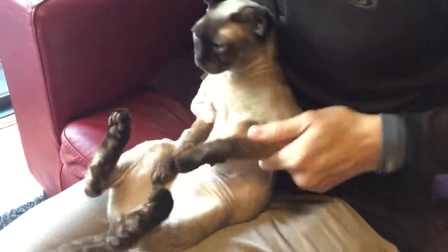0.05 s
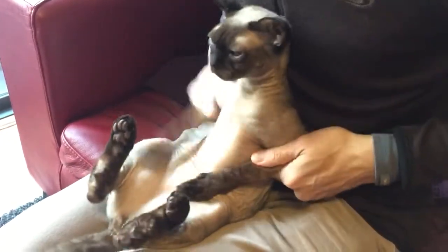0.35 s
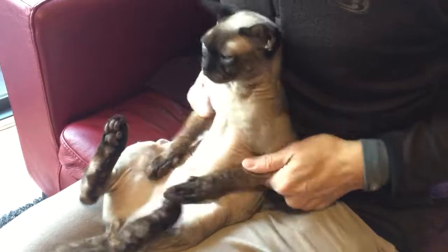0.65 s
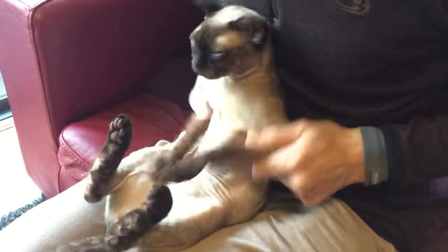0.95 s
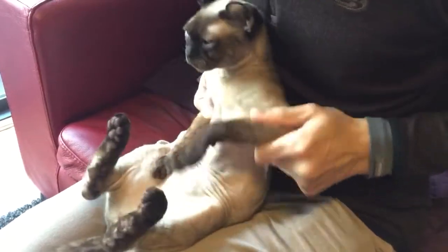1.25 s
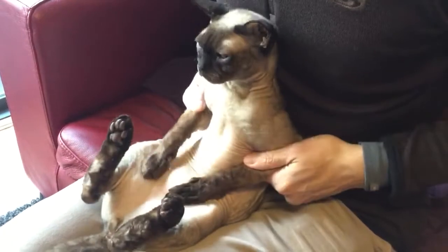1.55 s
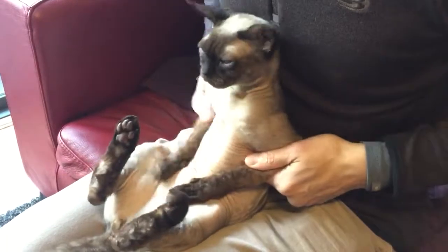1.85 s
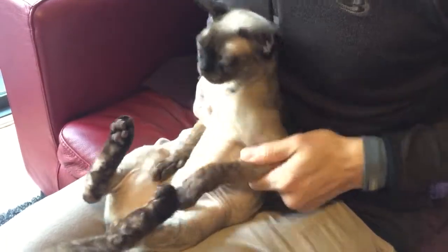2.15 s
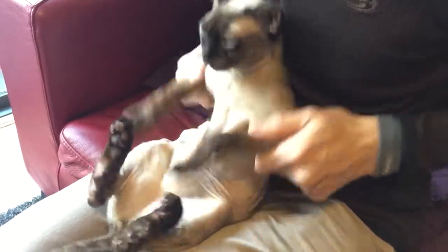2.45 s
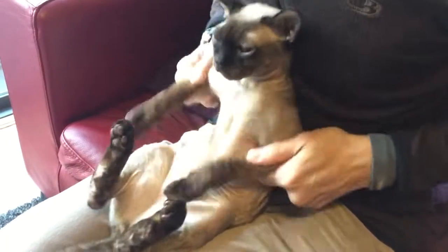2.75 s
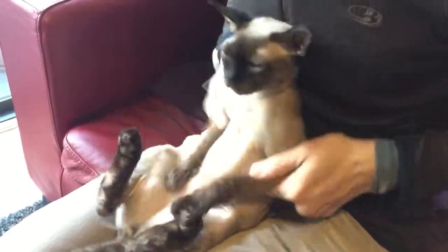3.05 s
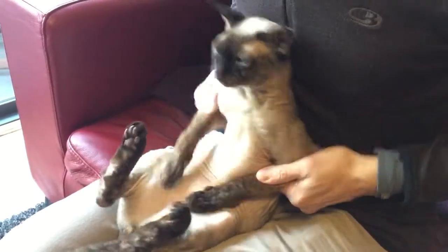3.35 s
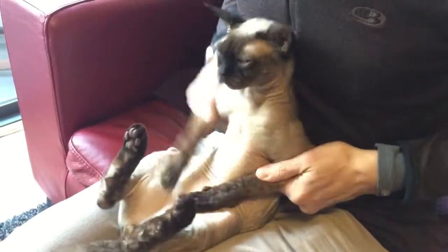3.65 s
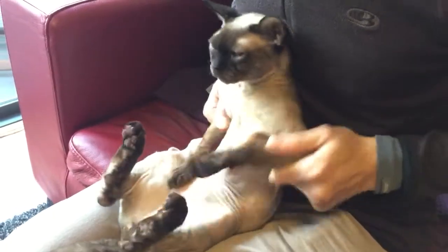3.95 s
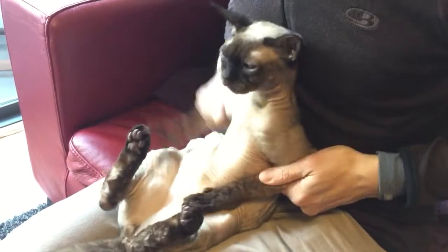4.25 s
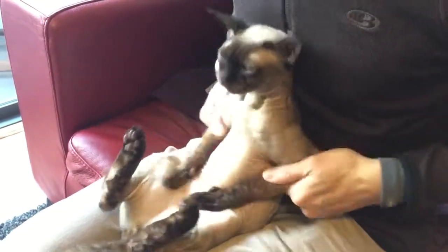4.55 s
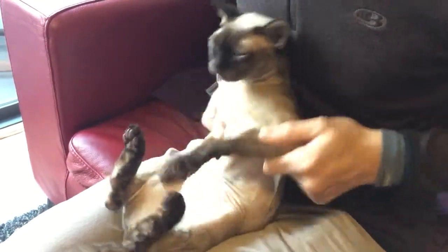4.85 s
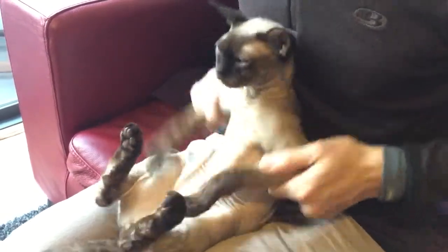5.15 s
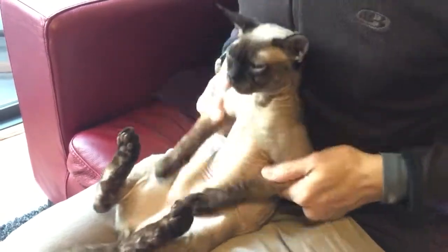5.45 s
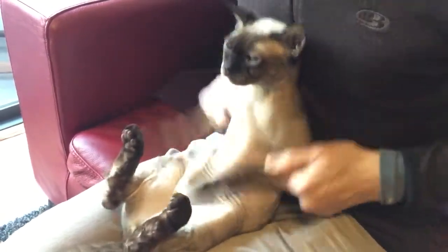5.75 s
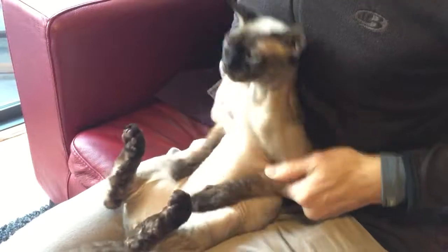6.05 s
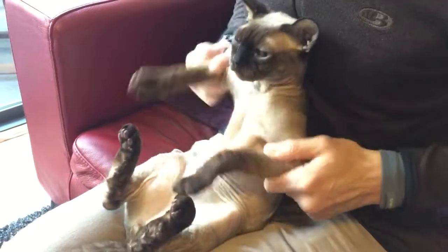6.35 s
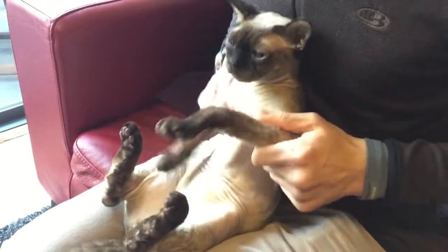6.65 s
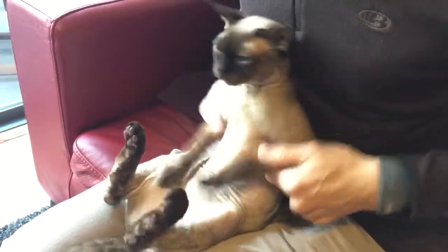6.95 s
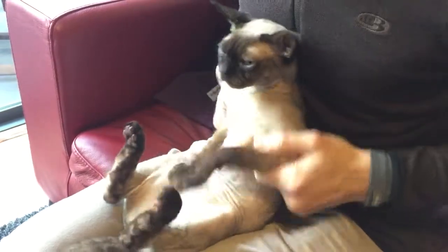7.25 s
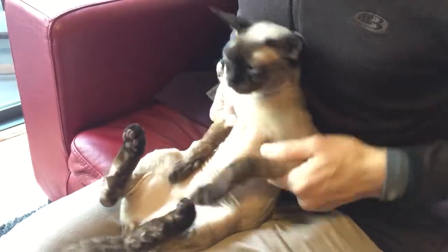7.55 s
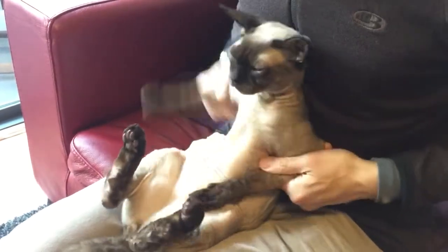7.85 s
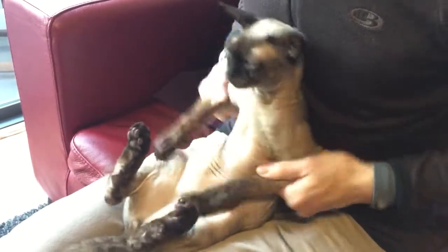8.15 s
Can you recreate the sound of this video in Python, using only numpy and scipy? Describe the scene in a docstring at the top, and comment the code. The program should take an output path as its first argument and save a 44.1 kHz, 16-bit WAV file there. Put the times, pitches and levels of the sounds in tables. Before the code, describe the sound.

Light, quick pats of paws on a cat's bare belly run from start to finish in a loose, irregular beat. Soft, drum-like thumps mix with brighter skin slaps and little pops of air, the strongest coming around the middle. Tiny fur brushes and claw clicks slip in between. The microphone seems near, in a quiet room with slight reverberation and a faint steady hum.

```python
"""Cat paws drumming on a belly

A cat sits on a lap in a quiet living room while two hands drum its front paws on its bare belly.
Each impact slaps the skin, expels a pop of trapped air and excites the belly's damped modes; often
the toes touch down just before the pad. Heavy pats ring longer, crisp ones tick. The room adds
reflections and a short reverberant tail, over a low hum and a faint rustle."""
import sys
import numpy as np
from scipy import signal
from scipy.fft import rfft, irfft
from scipy.io import wavfile

SR = 44100
rng = np.random.default_rng(int(sys.argv[2]) if len(sys.argv) > 2 else 0)


def digitize_waveform(pressure):
    """Quantize a signal to 16-bit integers and store it at the path in sys.argv[1].

    Rows of a 2-D input are taken as channels; values are limited to [-1, 1].
    """
    field = np.atleast_2d(pressure).T
    bounded = np.clip(field, -1, 1)
    quanta = np.round(bounded * 32767).astype(np.int16)
    wavfile.write(sys.argv[1], SR, quanta)


N = 365588
LEAD_S, TOUCH_S = .03, .12   # time ahead of contact, whole length of one touch


def from_db(db):
    """Amplitude ratio of a level in decibels."""
    return 10 ** (np.asarray(db) / 20)


def unit_rms(x):
    """Normalisation to unit mean power."""
    return x / np.sqrt(np.mean(x ** 2) + 1e-30)


def at_level(x, db):
    """Equivalent level: each row gets the energy of 10 ms at this rms level."""
    energy = np.sum(x ** 2, axis=-1, keepdims=True)
    return x * from_db(db) * np.sqrt(.01 * SR / (energy + 1e-30))


def band(x, low_hz, high_hz, order=2):
    """Band limiting by a causal Butterworth filter."""
    edges_hz = [low_hz, min(high_hz, .45 * SR)]
    return signal.sosfilt(signal.butter(order, edges_hz, "band", fs=SR, output="sos"), x)


def bell(x, hz, width_hz, gain_db):
    """A second-order peak or dip in the spectrum."""
    gain = from_db(gain_db / 2)
    width = np.tan(np.pi * width_hz / SR)
    tuning = -2 * np.cos(2 * np.pi * hz / SR)
    numerator = [1 + width * gain, tuning, 1 - width * gain]
    denominator = [1 + width / gain, tuning, 1 - width / gain]
    return signal.lfilter(numerator, denominator, x)


def at_hz(table, hz, column=1):
    """Interpolation of a table column over log frequency."""
    table = np.array(table)
    return np.interp(np.log(hz + 1e-9), np.log(table[:, 0]), table[:, column])


def drift(per_s):
    """Slow random modulation: straight lines between Gaussian values."""
    knots = rng.standard_normal(400)
    return np.interp(np.arange(N) / SR * per_s, np.arange(len(knots)), knots)


# Noise spectrum of still room air: frequency_hz, relative_density_db
AIR_SPECTRUM = [(20, -58), (45, 0.5), (120, 0), (170, -4), (300, -8.5), (500, -15), (800, -21),
                (2200, -22.5), (5000, -27), (10500, -31), (15000, -33.5)]
# Tones of an appliance hum: pitch_hz, peak_level_db
HUM_TONES = [(100, -65.5), (141, -74.5)]


def room_air(air_db, waver_db):
    """Ambient noise: a dull continuous spectrum plus hum tones modulated in level and phase."""
    hz = np.arange(N // 2 + 1) * SR / N
    t = np.arange(N) / SR
    spectrum = rfft(rng.standard_normal(N)) * from_db(at_hz(AIR_SPECTRUM, hz))
    out = from_db(air_db) * unit_rms(irfft(spectrum, N))
    for pitch_hz, level_db in HUM_TONES:
        amplitude = from_db(level_db + waver_db * drift(5.3))
        out += amplitude * np.sin(2 * np.pi * pitch_hz * t + 0.19 * drift(2.1))
    return out


def rustle(rub_db, uneven_db):
    """Friction noise: fur and cloth slide in short, uneven rubs made of fine grains."""
    fibres = rng.standard_normal(N) * from_db(9.0 * rng.standard_normal(N))
    rubs = from_db(rub_db + uneven_db * np.tanh(drift(26)))
    return unit_rms(band(fibres, 700, 4500)) * rubs


def echoes(reflections, t, spread):
    """Discrete reflections: delayed impulses whose path lengths vary as the paws move."""
    out = np.zeros(len(t))
    for delay_s, gain_db in reflections:
        out[round(delay_s * SR * (1 + spread * rng.uniform(-1, 1)))] += from_db(gain_db)
    return out


# Strong reflections from lap, sofa and walls: delay_s, gain_db
NEAR_REFLECTIONS = [(.0066, -16), (.0127, -23.5), (.0201, -22.5)]
# Far reflections that keep only the thump: delay_s, gain_db
FAR_REFLECTIONS = [(.0235, -58), (.0555, -23.5), (.0675, -29), (.082, -28)]
# Diffuse field of the room: frequency_hz, gain_db, t60_s
REVERBERATION = [(95.5, -11, 0.28), (292, -14, 0.3), (617, -16.5, 0.38), (1200, -9.5, 0.41),
                 (2400, -10, 0.35), (4700, -15, 0.42), (8000, -16.5, 0.36), (14000, -12, 0.3)]


def living_room(build_s):
    """Impulse response: discrete reflections and a diffuse tail decaying exponentially in each band."""
    t = np.arange(SR // 3) / SR
    response = band(echoes(NEAR_REFLECTIONS, t, spread=0.11), 380, 7100, order=1)
    response += band(echoes(FAR_REFLECTIONS, t, spread=0.028), 152, 385)
    edges_hz = np.geomspace(60, 16000, 11)
    for low, high in zip(edges_hz, edges_hz[1:]):
        centre_hz = np.sqrt(low * high)
        t60_s = at_hz(REVERBERATION, centre_hz, column=2)
        envelope = from_db(-60 * t / t60_s) * (1 - np.exp(-t / build_s))
        tail = unit_rms(band(rng.standard_normal(len(t)), low, high, order=3) * envelope)
        band_share = 2 * (high - low) / SR   # of a unit impulse's energy
        response += tail * from_db(at_hz(REVERBERATION, centre_hz)) * np.sqrt(band_share / len(t))
    return response


def play_in_room(events, sound_of, spots):
    """Superposition of direct and reflected sound; events cycle through spots with their own response."""
    out = np.zeros(N + SR)
    responses = [living_room(build_s=0.0042) for _ in range(spots)]
    for k, (start_s, *settings) in enumerate(events):
        direct, room_feed = sound_of(*settings)
        reflected = signal.fftconvolve(room_feed, responses[k % spots])
        start = round((start_s - LEAD_S) * SR)
        out[start:start + len(direct)] += direct
        out[start:start + len(reflected)] += reflected
    return out[:N]


def contact(t, grain_db, approach_s, settle_s, fur_db, fur_s):
    """Contact noise: an impulse amid grains from closing skin and brushing hair.
    Row 0 is the direct sound; row 1 feeds the room, where the grains of all directions average out."""
    before, after = np.minimum(t, 0), np.maximum(t, 0)
    click = 1. * (np.arange(len(t)) == np.argmin(np.abs(t)))
    closing = np.exp(before / approach_s - after / settle_s)
    fur = from_db(fur_db) * np.exp(before / (0.5 * fur_s) - after / fur_s)
    grains = unit_rms(rng.standard_normal(len(t)) * (closing + fur)) / np.sqrt(len(t))   # unit energy
    return np.array([click + from_db(grain_db) * grains, click])


def graze(level_db, centre_hz, width_octaves, swell_s):
    """Transient friction: hair or a claw grazes the skin in a burst of band-limited noise."""
    t = np.arange(int(TOUCH_S * SR)) / SR - LEAD_S
    friction = contact(t, grain_db=67, approach_s=swell_s, settle_s=swell_s, fur_db=-37, fur_s=0.016)
    edge_ratio = 2 ** (width_octaves / 2)
    return at_level(band(friction, centre_hz / edge_ratio, centre_hz * edge_ratio), level_db)


# Brushes of fur and clicks of claws: start_s, level_db, centre_hz, width_octaves, swell_s
GRAZES = [(.183, -59, 4030, 0.87, 0.0038), (.672, -54.5, 2400, 2.4, 0.003),
          (1.662, -56.5, 7100, 1.05, 0.002), (2.638, -57, 2190, 1.5, 0.0052),
          (2.94, -57.5, 2590, 0.2, 0.00099), (4.087, -56, 3200, 2.6, 0.0019), (5.16, -63.5, 3980, .8, 0.02),
          (5.3725, -53, 3300, 2.3, 0.00081), (6.22, -67, 4250, 0.43, 0.023),
          (6.6264, -38.5, 3630, 0.85, 0.00045), (6.966, -63, 6000, 1.1, 0.001),
          (7.056, -52.5, 7600, 0.23, .0004), (7.517, -55, 2550, 0.89, 0.00076),
          (7.5365, -45, 7730, 0.21, 0.00023)]


def fur_and_claws():
    """Grazing contacts excite the room without a thump from the belly."""
    return play_in_room(GRAZES, graze, spots=2)


def belly_mode(t, hz, t60_s, press_s, stretch):
    """Damped oscillation: it builds as the paw presses in, higher in pitch while the skin is stretched."""
    after = np.maximum(t, 0)
    cycles = hz * t + stretch * (1 - np.exp(-hz * after / 2))
    pressed = 1 + np.tanh(t / press_s - 1)
    return -np.sin(2 * np.pi * cycles) * from_db(-60 * after / t60_s) * pressed


def belly_thump(t, thump_db, skin_hz, push_db):
    """Membrane vibration: two skin modes, as on a drumhead, over a deep push of the flesh."""
    ring_s = .025 * 2 ** ((thump_db + 40) / 30)   # a heavier thump rings longer
    push_hz = 156.5 + 2.6 * (push_db + 45)   # flesh stiffens under a harder push
    skin = belly_mode(t, skin_hz, t60_s=ring_s, press_s=0.00068, stretch=0.059)
    overtone = belly_mode(t, 1.554 * skin_hz, t60_s=0.081, press_s=0.0033, stretch=0.028)
    push = belly_mode(t, push_hz, t60_s=0.016, press_s=0.002, stretch=0.0083)
    return at_level(skin, thump_db) + at_level(overtone, thump_db - 25) + at_level(push, push_db)


def air_pop(t, pop_db, slap_db, lightness_db):
    """Compression of trapped air: a harder slap squeezes it out at a higher pitch."""
    pop_hz = 701 + (slap_db + 46)   # 1 Hz per dB
    puff = contact(t, lightness_db + 3.5, approach_s=0.001, settle_s=0.0046, fur_db=-2, fur_s=0.0085)
    return at_level(band(puff, 0.55 * pop_hz, 1.35 * pop_hz), pop_db)


def skin_slap(t, slap_db, slap_hz, lightness_db):
    """Impact noise in three bands: the smack of the pad, the tick of hairs, the fizz of their tips."""
    warped_t = t / from_db(1.9 * lightness_db)   # a lighter blow closes more slowly
    pad = contact(warped_t, lightness_db + 4.9,
                  approach_s=0.00093, settle_s=0.00024, fur_db=-19.5, fur_s=0.0078)
    hairs = contact(warped_t, lightness_db - 1,
                    approach_s=0.00051, settle_s=0.00066, fur_db=-16, fur_s=0.0094)
    tips = contact(t, grain_db=2, approach_s=0.0025, settle_s=0.0016, fur_db=19, fur_s=0.011)
    smack = band(pad, 0.7 * slap_hz, 1.118 * slap_hz, order=1)
    smack = at_level(band(smack, 925, 3780, order=3), slap_db)
    tick_db = slap_db - 13 + 10.5 * np.log2(slap_hz / 2000)   # a brighter slap ticks more
    tick = at_level(band(hairs, 4380, 7380, order=3), tick_db)
    fizz = at_level(band(tips, 7300, 18000), 0.54 * tick_db - 40.5)   # grows less than the blow
    return smack + tick + fizz


def pat(thump_db, skin_hz, push_db, pop_db, slap_db, slap_hz):
    """Impulsive excitation: one landing drives thump, pop and slap together."""
    t = np.arange(int(TOUCH_S * SR)) / SR - LEAD_S
    lightness_db = 0.32 * np.clip(-32.5 - slap_db, -8, 14)   # light blows are grainy, hard ones clean
    thump = belly_thump(t, thump_db, skin_hz, push_db)
    pop = air_pop(t, pop_db, slap_db, lightness_db)
    slap = skin_slap(t, slap_db, slap_hz, lightness_db)
    return thump + pop + slap


# Light touches of the toes ahead of the pad: start_s, slap_db, slap_centre_hz
TOE_LANDINGS = [(0.18, -52.5, 1800), (1.4297, -48, 3280), (2.3946, -45, 2670), (2.646, -47.5, 2300),
                (3.0391, -52, 2250), (3.3957, -50.5, 2540), (4.3563, -46, 1170), (5.8511, -42, 1670),
                (6.1074, -42, 1640), (6.6237, -48, 1330), (7.05, -53, 1550), (7.9723, -52.5, 1220),
                (8.207, -57.5, 2350)]


def toe_pats(skin_hz):
    """Scaling with impact strength: thump, push and pop of each toe landing follow from its slap."""
    for start_s, slap_db, slap_hz in TOE_LANDINGS:
        thump_db, push_db = slap_db + 2, slap_db - 3
        pop_db = slap_db - 1.5 - 7.5 * np.log2(slap_hz / 2000)   # flat, dull landings trap more air
        yield start_s, thump_db, skin_hz, push_db, pop_db, slap_db, slap_hz


# Pats of the whole pad: start_s, thump_db, skin_pitch_hz, push_db, pop_db, slap_db, slap_centre_hz
PAD_LANDINGS = [(0.1895, -32.5, 282, -72, -57, -47.5, 2160), (0.4551, -54, 245, -51, -52, -56.5, 1400),
                (.677, -35, 325, -46.5, -53, -46.5, 2070), (0.991, -57.5, 332, -66, -46, -63, 1300),
                (1.083, -37, 262, -40.5, -50, -52.5, 2020), (1.194, -72, 230, -65, -62.5, -79, 1500),
                (1.4388, -32.5, 246, -47, -45, -38, 2670), (1.913, -49, 265, -57, -51.5, -58, 1430),
                (2.1622, -33.5, 287, -37, -44.5, -40, 2280), (2.3974, -29, 335, -45, -39, -32.5, 2960),
                (2.6562, -29.5, 296, -37.5, -57, -48, 2140), (2.9396, -55.5, 236, -50.5, -58.5, -64, 2370),
                (3.0524, -48, 264, -47, -71, -69, 2180), (3.129, -47.5, 285, -48, -80, -54.5, 2110),
                (3.4002, -32, 275, -38.5, -70, -44.5, 2130), (3.652, -37, 266, -38.5, -39, -38.5, 1760),
                (3.8861, -46.5, 308, -47, -54.5, -53.5, 2290),
                (4.092, -32.5, 295, -34.5, -42.5, -43.5, 2550), (4.3599, -52, 289, -44.5, -42, -42, 1900),
                (4.5762, -27.5, 320, -48, -39, -33.5, 2840), (4.6002, -47, 352, -42, -50, -38.5, 2600),
                (4.926, -52.5, 312, -55, -51.5, -79, 1400), (4.9966, -39, 332, -34.5, -45, -39.5, 2160),
                (5.118, -44.5, 281, -60, -45.5, -51, 1740), (5.3776, -37.5, 271, -31, -34, -35, 1960),
                (5.3901, -33, 287, -38.5, -43.5, -39.5, 1970), (5.8584, -41.5, 248, -42.5, -71, -49, 2050),
                (6.1248, -34.5, 269, -40.5, -52, -48.5, 2060), (6.6269, -34.5, 279, -38.5, -50, -32, 2070),
                (6.8931, -41.5, 275, -53, -54, -54.5, 1920), (6.9767, -39.5, 272, -40.5, -44.5, -42, 2400),
                (7.056, -43, 245, -44, -57, -48, 3400), (7.2951, -40, 286, -41, -45.5, -41, 1710),
                (7.5361, -35.5, 293, -38.5, -50, -37, 3850), (7.762, -42, 280, -44.5, -55, -48, 2100),
                (7.9835, -51, 265, -49.5, -52.5, -53.5, 2000),
                (8.2199, -50, 278, -52.5, -56.5, -58.5, 2200)]


def drumming_paws():
    """An impact train: pads and toes strike the belly and excite the room."""
    landings = [*PAD_LANDINGS, *toe_pats(skin_hz=288)]
    return play_in_room(landings, pat, spots=11)


# Colour of the paw sounds at the microphone: centre_hz, width_hz, gain_db
PAW_COLOUR = [(690, 200, 4.5), (772, 230, -4.5), (1630, 930, 1.5), (2196, 440, -5), (2890, 360, -3.5),
              (3400, 1600, 1.5), (5570, 170, 3.5), (7200, 2300, -6), (9000, 1100, 6), (9300, 1100, -5)]


def radiate(paws, low_cut_hz):
    """Radiation and colouring: a source as small as the belly gives off little deep bass."""
    for centre_hz, width_hz, gain_db in PAW_COLOUR:
        paws = bell(paws, centre_hz, width_hz, gain_db)
    return signal.sosfilt(signal.butter(2, low_cut_hz, "high", fs=SR, output="sos"), paws)


def scene():
    """Sound pressures add in one channel: the paws over rustle and room air."""
    paws = radiate(drumming_paws() + fur_and_claws(), low_cut_hz=75)
    return (paws + rustle(rub_db=-80, uneven_db=1) + room_air(air_db=-67.5, waver_db=2))[None]


def record(dry):
    """Band limiting: a steep elliptic low-pass removes the treble above 15.2 kHz."""
    return signal.sosfilt(signal.ellip(10, .1, 70, 15200, fs=SR, output="sos"), dry)


dry = scene()
out = record(dry)
digitize_waveform(out)
```